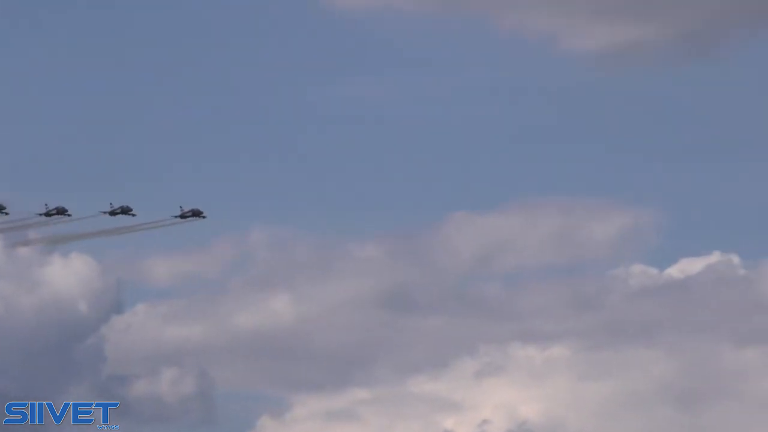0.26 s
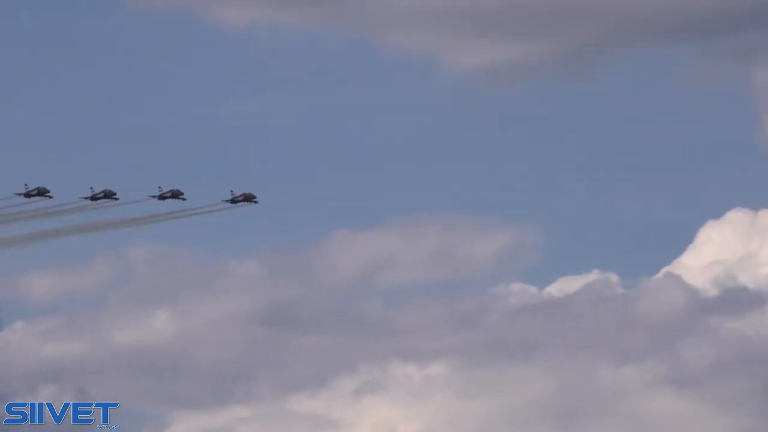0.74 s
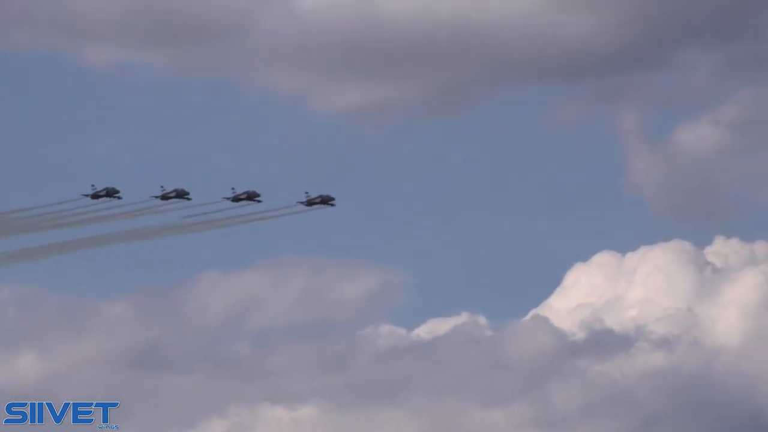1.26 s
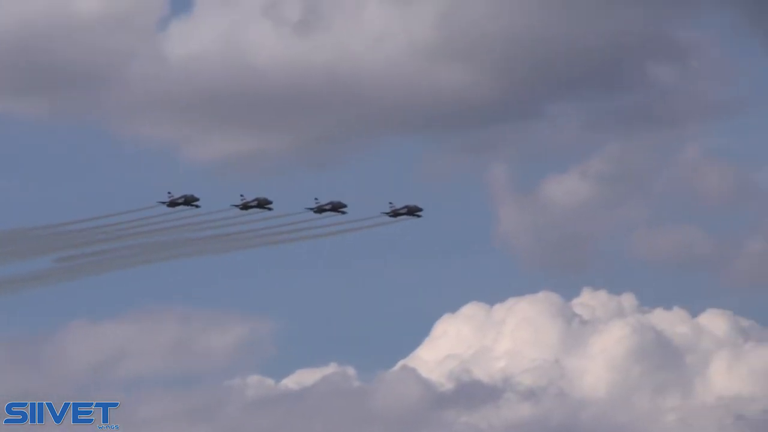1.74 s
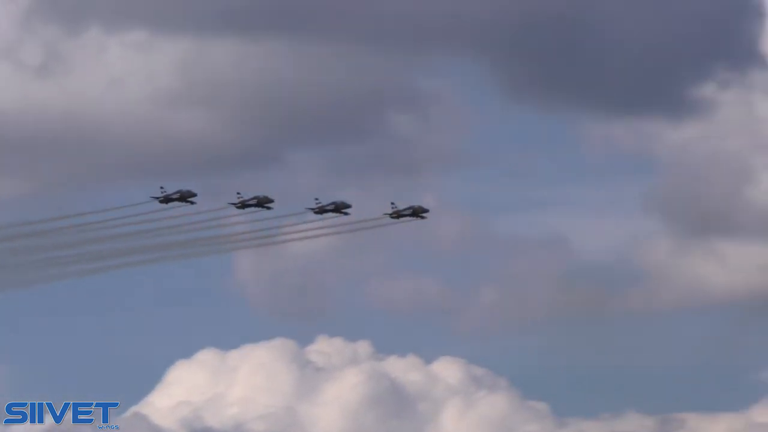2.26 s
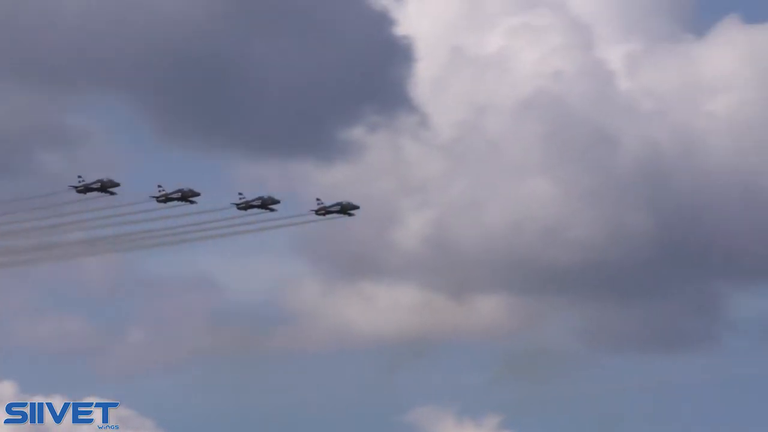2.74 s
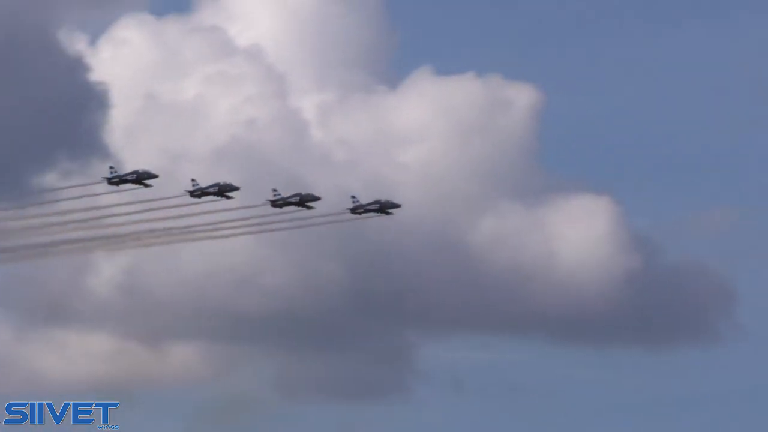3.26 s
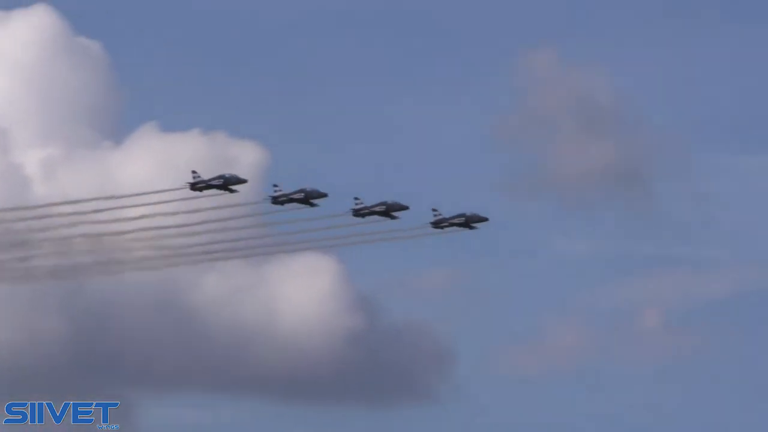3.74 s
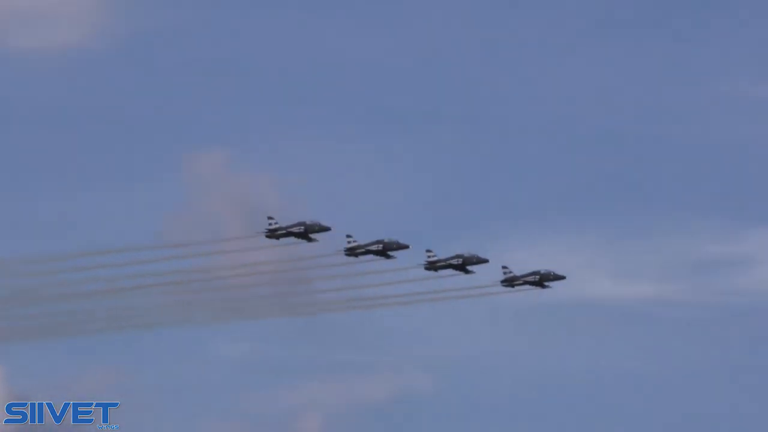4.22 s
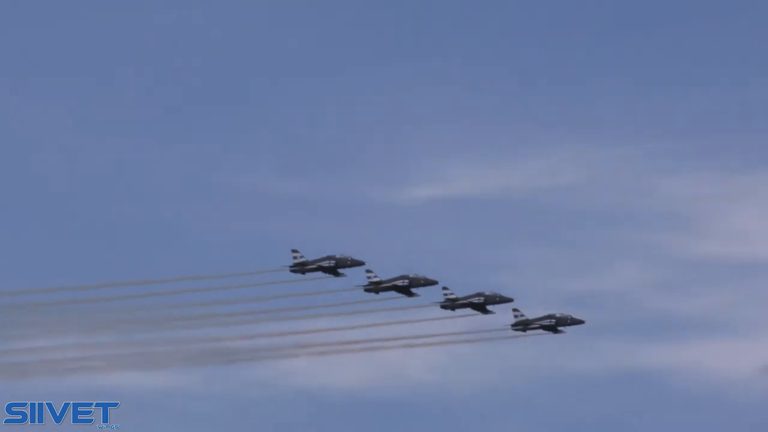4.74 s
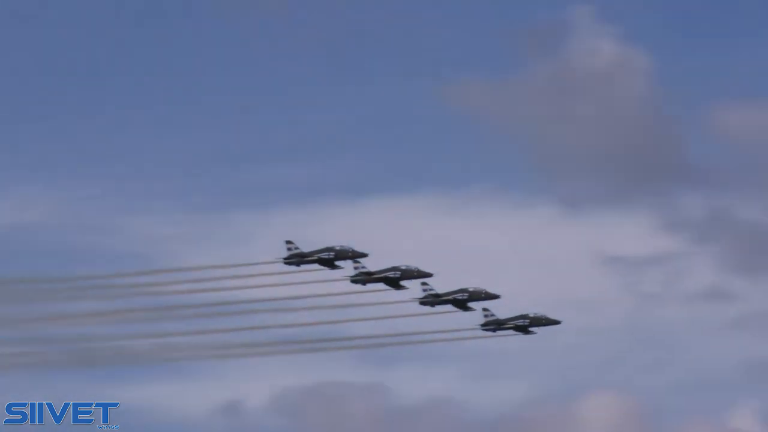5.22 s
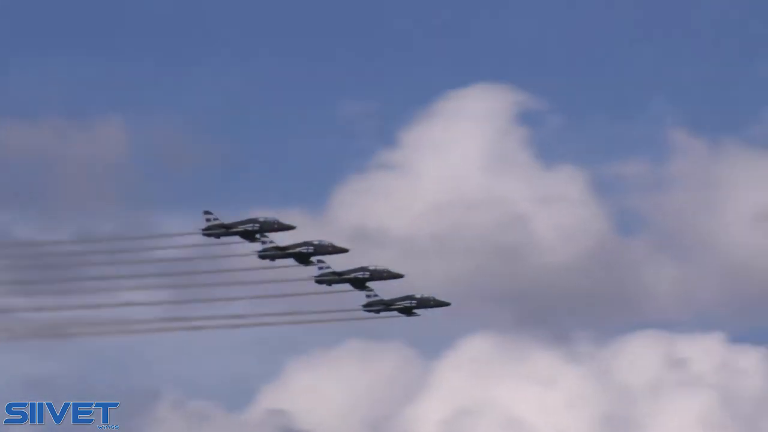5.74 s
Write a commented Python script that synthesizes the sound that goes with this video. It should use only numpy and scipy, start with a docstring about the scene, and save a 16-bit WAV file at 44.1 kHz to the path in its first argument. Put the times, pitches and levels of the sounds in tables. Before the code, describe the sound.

Four jets approach in formation on a windy airfield, roar swelling unevenly and fan whine sinking, while gusts thump the microphone and camera shutters rattle nearby.

```python
"""On a windy airfield, four jets approach in formation, their fan whines sinking.
The roar is flickering bands of noise, combed by a delayed copy off the ground; each whine is a smeared tone.
A mid-range roar band and bands of hiss glide with the fan pitch; a harsh tearing edge joins close by.
Gusts, as low noise bands, buffet the single microphone; camera shutters rattle nearby as short noise
bursts through body resonances, over a far roar and faint ticks of more cameras."""
import sys
import numpy as np
from scipy import signal
from scipy.io import wavfile
from scipy.ndimage import uniform_filter1d, map_coordinates

SR = 44100
rng = np.random.default_rng(int(sys.argv[2]) if len(sys.argv) > 2 else 0)


def wrap_up_sound(samples):
    """Save the sound to the file named by the first command line argument, as 16-bit audio."""
    columns = np.atleast_2d(samples).T
    # keep every value between -1 and 1, then stretch to whole-number steps
    tamed = np.clip(columns, -1, 1)
    steps = np.round(tamed * 32767).astype(np.int16)
    wavfile.write(sys.argv[1], SR, steps)


N = 263718


def from_db(db):
    """Amplitude factor of a level in dB."""
    return 10 ** (np.asarray(db) / 20)


def rms_one(x):
    """Scale to an RMS of 1."""
    return x / np.sqrt(np.mean(x ** 2) + 1e-20)


def in_time(rows):
    """Interpolate each column after start_s to every sample."""
    start_s, *columns = np.transpose(rows)
    return [np.interp(np.arange(N) / SR, start_s, column) for column in columns]


def at_hz(points, hz):
    """Read a spectrum at hz, linear in dB over log frequency."""
    point_hz, point_db = np.array(points).T
    return np.interp(np.log(hz), np.log(point_hz), point_db)


def band(x, low_hz, high_hz):
    """Butterworth band-pass."""
    return signal.sosfilt(signal.butter(2, [low_hz, high_hz], "band", fs=SR, output="sos"), x)


def drift(corner_hz):
    """Slow noise of RMS 1: two one-pole low-passes at every 40th sample, run in, then interpolated."""
    pole = np.exp(-80 * np.pi * corner_hz / SR)
    white = rng.standard_normal(N // 40 + 2002)
    slow = signal.lfilter([1], [1, -2 * pole, pole * pole], white)[2000:]
    return np.interp(np.arange(N) / 40, np.arange(len(slow)), rms_one(slow))


def turbulence(spectrum, edges_hz, lift_db, from_hz, to_hz, patchy_db, flicker_hz, swell_db):
    """Noise bands flicker together and alone; lift and slow swells grow in from from_hz to to_hz."""
    out = 0
    together = drift(flicker_hz)
    white = rng.standard_normal((2, N + SR))  # the first second runs the filters in
    for k, (low_hz, high_hz) in enumerate(zip(edges_hz, edges_hz[1:])):
        middle_hz = np.sqrt(low_hz * high_hz)
        share = np.clip(np.log(middle_hz / from_hz) / np.log(to_hz / from_hz), 0, 1)
        flicker_db = patchy_db * (1.07 * together + drift(flicker_hz))
        flicker_db = flicker_db + swell_db * share * drift(1.83)
        band_db = at_hz(spectrum, middle_hz) + share * lift_db + flicker_db
        out = out + from_db(band_db) * band(white[k % 2], low_hz, high_hz)[SR:]
    return out


# gusts on the microphone: start_s, level_db, flutter_db (upper bands; only its swing about the mean counts)
GUSTS = [(0.0, -17.5, -16.5), (0.11, -20, -8.5), (0.3, -27, -12), (0.4, -34.5, -7.5), (0.48, -25, -11),
         (0.54, -39, -4), (0.6, -28, -14), (0.72, -31.5, -12), (0.82, -21, -7), (0.87, -35, -8.5),
         (0.93, -14, -18.5), (1.05, -29.5, 1), (1.1, -18.5, -14), (1.16, -28, -4.5), (1.26, -19, -1),
         (1.62, -25, -9.5), (1.68, -17.5, -15.5), (1.78, -23, 1), (1.84, -19, -2), (1.97, -16.5, -12.5),
         (2.03, -24.5, -10.5), (2.18, -26, -4), (2.27, -16.5, -4), (2.36, -18, -11.5), (2.58, -20.5, -3.5),
         (2.68, -14.5, -13.5), (3.08, -17, -7), (3.15, -14, -13.5), (3.3, -13, -15), (3.41, -16.5, 1.5),
         (3.54, -12, -13), (3.62, -23, -3), (3.81, -16, -4), (4.2, -24, -8.5), (4.25, -5, -28.5),
         (4.34, -23.5, -3.5), (4.4, -13.5, -9.5), (4.55, -25.5, -2.5), (4.9, -23.5, 2), (5.14, -14.5, -3.5),
         (5.41, -24, 1.5), (5.56, -8.5, -10.5), (5.78, -24.5, 4), (5.98, -20, -6)]
# buffeting spectrum: freq_hz, density_db (per Hz, relative)
BUFFET_SPECTRUM = [(11, -31), (18, -4), (49, -1.5), (76, -4.5), (122, -9), (309, -26), (450, -35.5),
                   (580, -55), (990, -120)]


def wind():
    """Eddies buffet the microphone; the flutter column tilts their upper bands."""
    level_db, flutter_db = in_time(GUSTS)
    edges_hz = 16 * 2 ** np.arange(0, 5.1, .5)
    eddies = turbulence(BUFFET_SPECTRUM, edges_hz, flutter_db - flutter_db.mean(), 58, 147,
                        patchy_db=2.0, flicker_hz=14.0, swell_db=1.2)
    return from_db(level_db) * rms_one(eddies)


# formation through the air: start_s, roar_db, treble_db (relative; only its swing counts), whine_db
PASS = [(0.0, -50.5, 7, -58), (0.15, -42, -4, -58), (0.4, -45.5, -5.5, -66), (0.6, -42.5, -7.5, -68),
        (0.78, -39.5, -5.5, -67), (0.95, -40.5, -8.5, -69), (1.13, -46.5, -5.5, -78),
        (1.24, -42, -2.5, -72), (1.4, -39, -7.5, -67), (1.55, -40, -1, -60), (1.8, -41, -10, -56),
        (2.04, -46, -13.5, -62), (2.07, -43, 2.5, -56), (2.25, -40.5, -3.5, -57.5), (2.38, -47.5, -9, -68),
        (2.45, -45, -4.5, -56), (2.6, -40.5, -10, -57.5), (2.8, -41, -9, -51.5), (2.98, -35.5, -9, -52),
        (3.3, -38.5, -10, -47), (3.48, -37.5, -10, -56), (3.62, -37, -13.5, -50), (3.82, -32.5, -15, -47.5),
        (3.91, -34, -13, -47), (3.97, -28.5, -7, -48), (4.05, -29, -16.5, -39), (4.17, -31.5, -10, -36.5),
        (4.27, -35, -8, -43), (4.34, -36.5, -5.5, -35), (4.42, -36, -9.5, -44.5), (4.56, -37.5, -13, -52),
        (4.65, -34, -8.5, -45.5), (4.78, -37.5, -10.5, -42), (4.85, -30, -13.5, -38),
        (4.95, -29, -9.5, -36), (5.08, -32.5, -16, -40.5), (5.16, -30.5, -32.5, -37.5),
        (5.22, -29, -22.5, -33.5), (5.33, -32, -23, -42.5), (5.39, -31, -19.5, -34),
        (5.47, -28, -24, -40.5), (5.65, -38, -12.5, -44), (5.76, -30.5, -23, -33), (5.83, -34, -13.5, -48),
        (5.92, -39.5, -23.5, -47), (5.98, -32, -12, -44)]
# exhaust spectrum: freq_hz, density_db (per Hz, relative)
ROAR_SPECTRUM = [(150, -3), (350, 4.5), (600, -2), (1000, -2.5), (1600, -6.5), (2300, -11.5), (3300, -15.5),
                 (4000, -22), (5000, -22.5), (6500, -44.5), (9000, -45), (16000, -64)]


def roar():
    """Exhaust mixing noise; the air on the way decides how much treble is left."""
    roar_db, treble_db, _ = in_time(PASS)
    edges_hz = 150 * 2 ** np.arange(0, 6.9, 1 / 3)
    jet = turbulence(ROAR_SPECTRUM, edges_hz, treble_db - treble_db.mean(), 1730, 6540,
                     patchy_db=1.6, flicker_hz=10, swell_db=1.6)
    return from_db(roar_db) * rms_one(jet)


# ground reflection: start_s, lag_ms, strength (0-1)
GROUND = [(0, 1.08, 0.04), (2.5, 1.22, 0.14), (3.3, 1.255, 0.35), (4.1, 1.32, 0.4), (5.1, 1.566, 0.55),
          (5.98, 1.91, 0.86)]
GROUND_CUT_HZ = 2050


def over_ground(direct):
    """Direct sound plus a duller copy off the ground, lagging more as the jets rise above the horizon."""
    lag_ms, strength = in_time(GROUND)
    dull = signal.sosfilt(signal.butter(1, GROUND_CUT_HZ, fs=SR, output="sos"), direct)
    late = map_coordinates(dull, [np.arange(N) - lag_ms * SR / 1000], order=3, mode="nearest")
    return (direct + strength * late) / np.sqrt(1 + strength ** 2)


# fan tones: start_s, pitch_hz (middle), spread (exponent on pitch_ratio)
FAN = [(0, 3260, 0.92), (2, 3103, 1.08), (3, 2960, 0.87), (4.1, 2847, 1.09), (4.4, 2778, 0.65),
       (4.72, 2745, .55), (4.9, 2670, 1.1), (5.2, 2617, 0.93), (5.98, 2437, 0.78)]


def fan_pitch():
    """Middle fan tone in Hz, sinking as the approach slows."""
    return in_time(FAN)[0]


# the four fans: pitch_ratio, level_db (relative)
ENGINES = [(0.944, -2), (.982, -1), (1.018, -1), (1.058, -10)]
SMEAR_CORNER_HZ = 31


def whine():
    """One fan tone an engine, smeared to a narrow band by turbulent air that makes all four flare together."""
    pitch_hz, spread = in_time(FAN)
    level_db = in_time(PASS)[2]
    fans = 0
    for pitch_ratio, engine_db in ENGINES:
        smear = drift(SMEAR_CORNER_HZ) + 1j * drift(SMEAR_CORNER_HZ)
        turns = np.cumsum(pitch_hz * pitch_ratio ** spread) / SR
        tone = (smear * np.exp(2j * np.pi * turns)).real
        fans = fans + from_db(engine_db + 1.5 * drift(16)) * tone
    flare = from_db(1.8 * drift(11))
    return from_db(level_db) * rms_one(flare * fans)


def gliding_bands(bands, swell_db, swell_hz):
    """Bands of noise that ride on the fan pitch, each swelling on its own."""
    turns = np.cumsum(fan_pitch()) / SR
    out = 0
    for multiple, half_width_hz, band_db in bands:
        low_pass = signal.butter(2, half_width_hz, fs=SR, output="sos")
        a, b = signal.sosfilt(low_pass, rng.standard_normal((2, N)))
        hiss = ((a + 1j * b) * np.exp(2j * np.pi * multiple * turns)).real
        out = out + from_db(band_db + swell_db * drift(swell_hz)) * rms_one(hiss)
    return out


# mid-range roar band: multiple (of fan pitch), half_width_hz, band_db (relative)
MID_ROAR_BANDS = [(.5, 118, -2.5)]
# its level: start_s, level_db
MID_ROAR_LEVEL = [(0, -70), (0.4, -66), (0.9, -51), (1.12, -52), (1.3, -47), (1.65, -54), (2.3, -68),
                  (2.65, -54), (3.0, -48), (3.25, -49), (3.6, -58), (3.9, -55), (4.18, -38.5), (4.35, -45),
                  (4.6, -59), (5.0, -74), (5.98, -82)]


def mid_roar():
    """A swelling mid-range band of roar, set at half the fan pitch."""
    level_db = in_time(MID_ROAR_LEVEL)[0]
    return from_db(level_db) * gliding_bands(MID_ROAR_BANDS, swell_db=3.0, swell_hz=21.0)


SPEED_M_S, NEAREST_M, ABEAM_S = 108, 510, 6.96  # straight flight


def nose_on():
    """Cosine of the angle between the heading and the line to the microphone."""
    ahead_m = SPEED_M_S * (ABEAM_S - np.arange(N) / SR)
    return ahead_m / np.hypot(ahead_m, NEAREST_M)


def thrown_forward(head_on_db, treble_share, loss_db_per_halving):
    """Gain that swings with the roar's treble and fades as the cosine off the nose falls."""
    roar_db, treble_db, _ = in_time(PASS)
    swing_db = roar_db + treble_db - np.mean(roar_db + treble_db)
    beam_db = loss_db_per_halving * np.log2(np.clip(nose_on(), .02, 1))
    return from_db(head_on_db + treble_share * swing_db + beam_db)


# intake hiss: multiple (of fan pitch), half_width_hz, band_db (relative)
INTAKE_BANDS = [(.45, 382, -5), (1.03, 260, -4.5), (1.62, 486, -3)]


def intakes():
    """Broad bands of fan hiss, thrown forward from the intakes."""
    beam = thrown_forward(head_on_db=-52, treble_share=0.53, loss_db_per_halving=11.4)
    return beam * gliding_bands(INTAKE_BANDS, swell_db=0.8, swell_hz=6.0)


# hiss above the roar: multiple (of fan pitch), half_width_hz, band_db (relative)
TOP_HISS_BANDS = [(2.15, 600, 6), (2.5, 430, 4.5), (3.0, 513, -1.5)]
# its level: start_s, level_db
TOP_HISS_LEVEL = [(0, -67), (0.35, -70), (0.7, -60.5), (1.05, -77), (1.5, -61.5), (1.85, -73),
                  (2.15, -64.5), (2.45, -72), (3.0, -64), (3.25, -69), (3.47, -59), (3.62, -72),
                  (3.85, -59), (3.93, -65), (4.05, -53.5), (4.18, -86), (4.42, -63), (4.6, -81),
                  (5.98, -91)]


def top_hiss():
    """Patchy bands of noise above the roar that sink with the whine."""
    hiss = gliding_bands(TOP_HISS_BANDS, swell_db=2.5, swell_hz=10.0)
    return from_db(in_time(TOP_HISS_LEVEL)[0]) * rms_one(hiss)


FAR_START_DB, FAR_DIES_DB_PER_S = -42.5, 2.5
FAR_LOW_HZ, FAR_HIGH_HZ = 332, 730


def far_roar():
    """Low noise with the treble long lost, dying away."""
    level_db = FAR_START_DB - FAR_DIES_DB_PER_S * np.arange(N) / SR
    low_noise = rms_one(band(rng.standard_normal(N), FAR_LOW_HZ, FAR_HIGH_HZ))
    return from_db(level_db + 0.34 * drift(0.92)) * low_noise


FAR_TICKS_PER_S, FAR_TICK_DB = 50, -69.5  # median rate, median onset gain


def far_shutters():
    """Faint ticks of cameras further along, in clumps: decaying bursts of high noise."""
    chance = FAR_TICKS_PER_S * from_db(6.0 * drift(3)) / SR
    ticks = (rng.random(N) < chance) * from_db(rng.normal(0, 1.0, N))
    decay = np.exp(-1 / (0.0035 * SR))  # 3.5 ms
    bursts = signal.lfilter([1], [1, -decay], ticks + 1e-18)
    return from_db(FAR_TICK_DB) * bursts * rms_one(band(rng.standard_normal(N), 4600, 13000))


# parts moving after each camera's release: delay_ms, level_db (relative to shot), rattle_ms (capped at 15)
MECHANISMS = {"heavy": [(0, -3.5, 3), (39, -8.5, 14), (59.5, -5.5, 19), (94, -13, 6)],
              "crisp": [(0, -3, 2.7), (5.58, 9, 1.55), (21.6, -19, 6), (46.8, 1, 5.2), (79, -3, 13)],
              "slow": [(0, -4.5, 7.6), (96, 1.5, 3.4)]}
# shots of each camera: start_s, level_db
SHOTS = {"heavy": [(0.2324, -47), (0.6155, -49.5), (1.1322, -53), (1.5115, -47), (2.0146, -51.5)],
         "crisp": [(2.6360, -57), (4.5094, -57), (4.8641, -55), (5.3545, -54), (5.7532, -55.5)],
         "slow": [(2.9990, -50.5), (4.6962, -56), (5.5003, -55), (5.8345, -59)]}
# further single contacts, some from the cameras above: start_s, level_db
TICKS = [(0.192, -59), (0.592, -53), (0.9233, -60), (1.3568, -65), (1.5429, -59), (2.061, -62),
         (2.138, -57), (2.1715, -58), (2.9482, -59), (2.9831, -59), (3.056, -58), (3.19, -65), (3.265, -60),
         (3.3054, -59), (3.369, -51.5), (3.602, -62), (4.276, -63), (4.4962, -60), (5.0025, -62),
         (5.264, -61)]
TICK_RATTLE_MS = 7.5


def contacts():
    """Every shot runs through its camera's mechanism: rows of start_s, level_db, rattle_ms."""
    rows = []
    for camera, shots in SHOTS.items():
        for shot_s, shot_db in shots:
            for delay_ms, part_db, rattle_ms in MECHANISMS[camera]:
                rows.append((shot_s + delay_ms / 1000, shot_db + part_db, rattle_ms))
    return rows + [(tick_s, tick_db, TICK_RATTLE_MS) for tick_s, tick_db in TICKS]


# camera body resonances: freq_hz, width_hz, mode_db (relative)
CAMERA_BODY = [(5200, 1850, 11.5), (8140, 2300, 8), (11260, 2600, 1), (13700, 6100, -1)]
SETTLING_S, SETTLING_DB = .016, -13


def shutters():
    """Each contact is an uneven rattle, coloured anew by the broad resonances of the camera body."""
    rows = contacts()
    length = 2600
    t = np.arange(length) / SR
    rattles = rng.standard_normal((len(rows), length))
    uneven = from_db(18.0 * uniform_filter1d(rng.standard_normal(rattles.shape), size=40, axis=1))
    colours_db = rng.normal(0, 1.8, (len(rows), len(CAMERA_BODY)))
    rattle_s = np.clip(np.array(rows)[:, 2:3], .5, 15) / 1000
    # parts chatter for a while, then springs and mirror settle
    chatter = np.exp(-(t / rattle_s) ** 4)
    settling = from_db(SETTLING_DB) * np.exp(-t / SETTLING_S)
    attack = 1 - np.exp(-t / .0008)
    rattles = rattles * uneven * (chatter + settling) * attack
    rings = 0
    for k, (freq_hz, width_hz, mode_db) in enumerate(CAMERA_BODY):
        mode = band(rattles, freq_hz - width_hz / 2, freq_hz + width_hz / 2)
        rings = rings + from_db(mode_db + colours_db[:, k:k + 1]) * mode
    out = np.zeros(N + length)
    for (start_s, level_db, _), ring in zip(rows, rings):
        at = round(start_s * SR)
        out[at:at + length] += from_db(level_db) * ring
    return out[:N]


TEARING_LOW_HZ, TEARING_HIGH_HZ = 2880, 4770
# harsh edge of the roar: start_s, level_db
TEARING_LEVEL = [(3.3, -80), (3.65, -59), (3.83, -49.5), (3.9, -65), (4.0, -51), (4.18, -55.5), (4.4, -64),
                 (4.7, -56), (4.92, -54), (5.06, -50.5), (5.25, -70), (5.98, -75)]


def tearing():
    """The harsh upper edge of the close roar: steeply bounded noise, roughened by fast flicker."""
    once = band(rng.standard_normal(N), TEARING_LOW_HZ, TEARING_HIGH_HZ)
    hiss = band(once, TEARING_LOW_HZ, TEARING_HIGH_HZ)
    return from_db(in_time(TEARING_LEVEL)[0] + 3.5 * drift(22)) * rms_one(hiss)


# band above twice the fan pitch: multiple (of fan pitch), half_width_hz, band_db (relative)
OVERTONE_BANDS = [(2.17, 302, -10)]
# its level: start_s, level_db
OVERTONE_LEVEL = [(3.4, -85), (3.8, -65), (4.05, -67), (4.15, -69), (4.3, -62.5), (4.5, -60), (4.65, -85)]


def overtone():
    """A short-lived band of hiss above twice the fan pitch."""
    level_db = in_time(OVERTONE_LEVEL)[0]
    return from_db(level_db) * gliding_bands(OVERTONE_BANDS, swell_db=5.5, swell_hz=8.0)


def scene():
    """Jets, wind, far roar and cameras, alike in both tracks."""
    jets = over_ground(roar()) + whine() + mid_roar() + intakes() + top_hiss() + tearing() + overtone()
    mono = wind() + jets + far_roar() + far_shutters() + shutters()
    return np.array([mono, mono])


SHARED_HISS_DB, OPPOSED_HISS_DB, OPPOSED_RUMBLE_DB = -69, -72.5, -63
HISS_EDGE_HZ, CUTOFF_HZ = 8000, 15800


def record(dry):
    """Rounded peaks, a shared hiss, thin hiss and rumble of opposite sign in the tracks; the top is cut."""
    shared, hiss, rumble = rng.standard_normal((3, N))
    hiss = signal.sosfilt(signal.butter(6, HISS_EDGE_HZ, "high", fs=SR, output="sos"), hiss)
    opposed = from_db(OPPOSED_HISS_DB) * rms_one(hiss)
    opposed = opposed + from_db(OPPOSED_RUMBLE_DB) * rms_one(band(rumble, 22, 59))
    rounded = 0.83 * np.tanh(dry / 0.62)
    wet = rounded + from_db(SHARED_HISS_DB) * shared + opposed * [[1], [-1]]
    return signal.sosfilt(signal.ellip(12, .5, 70, CUTOFF_HZ, fs=SR, output="sos"), wet)


dry = scene()
out = record(dry)
wrap_up_sound(out)
```